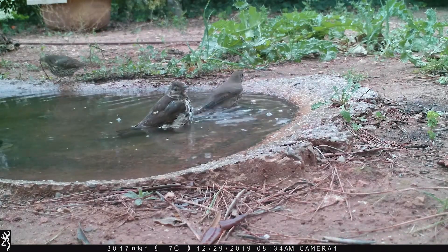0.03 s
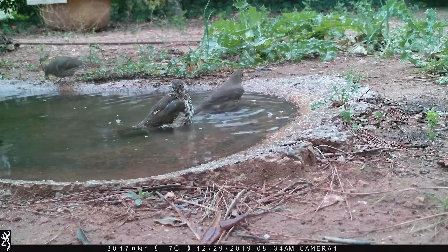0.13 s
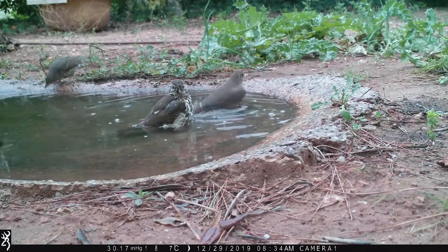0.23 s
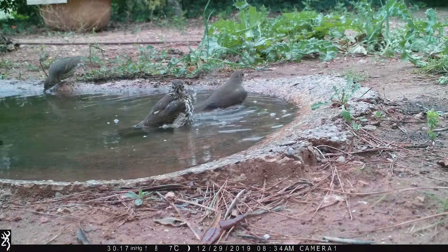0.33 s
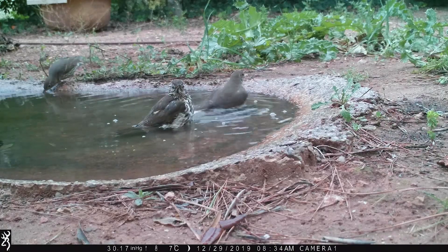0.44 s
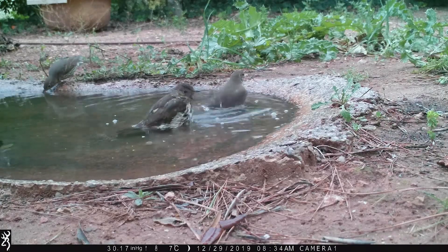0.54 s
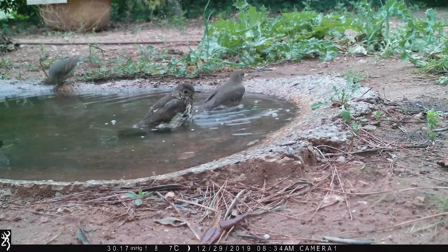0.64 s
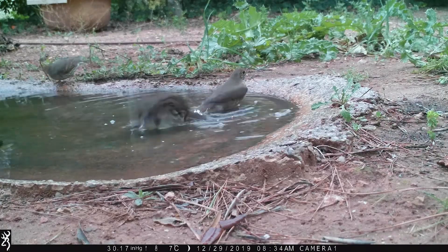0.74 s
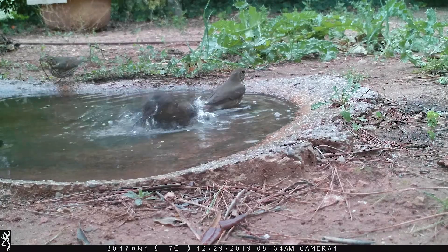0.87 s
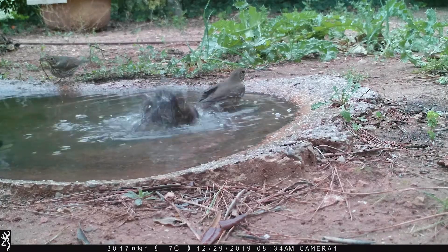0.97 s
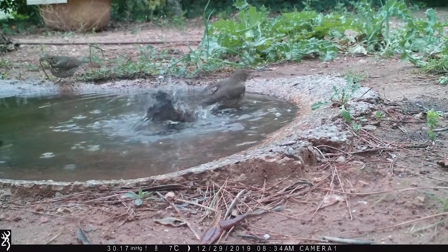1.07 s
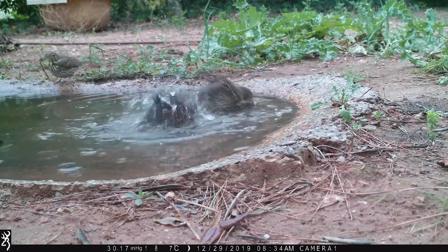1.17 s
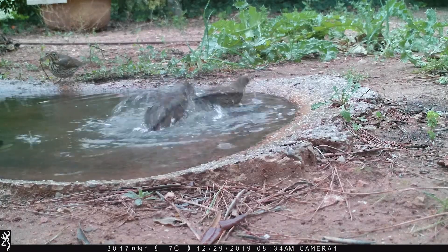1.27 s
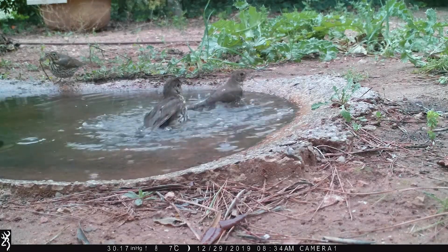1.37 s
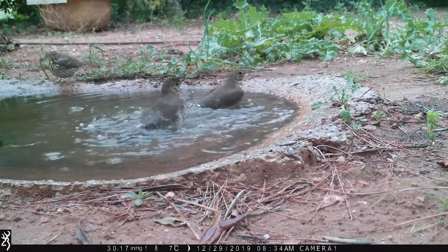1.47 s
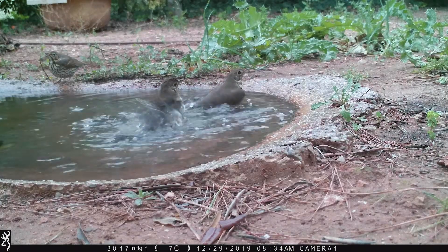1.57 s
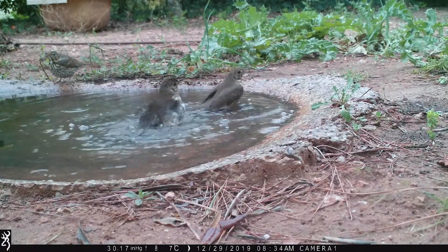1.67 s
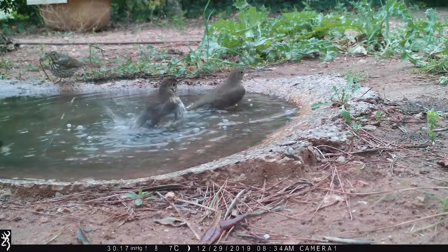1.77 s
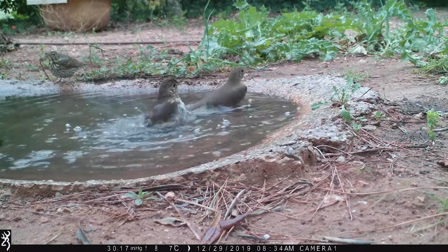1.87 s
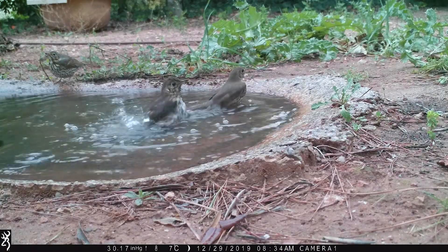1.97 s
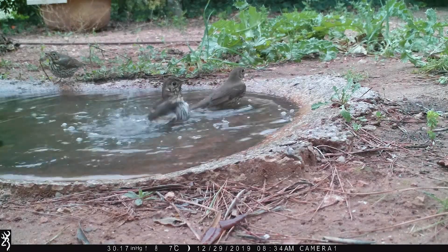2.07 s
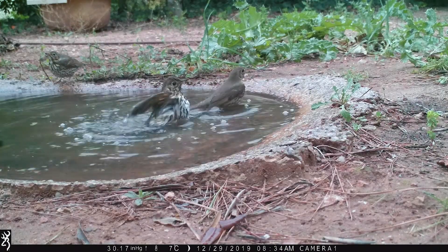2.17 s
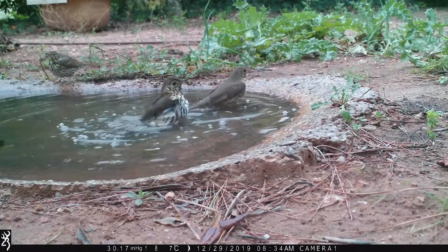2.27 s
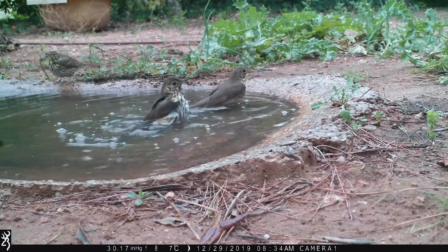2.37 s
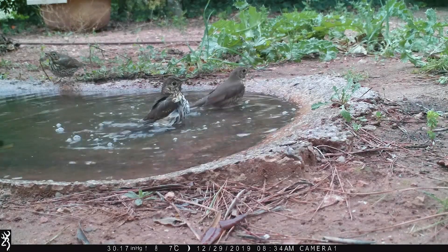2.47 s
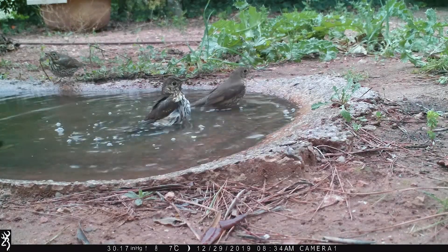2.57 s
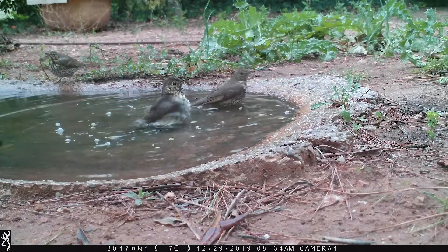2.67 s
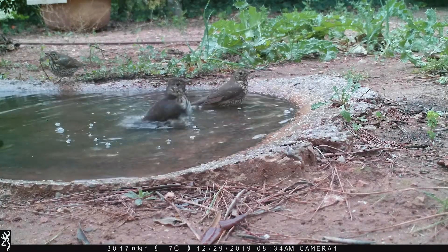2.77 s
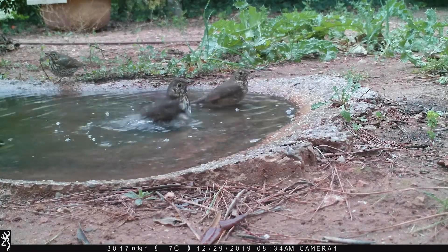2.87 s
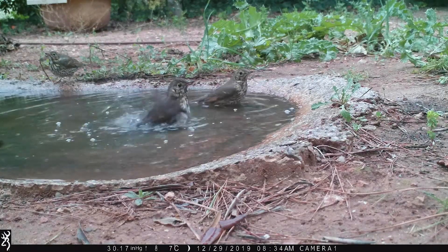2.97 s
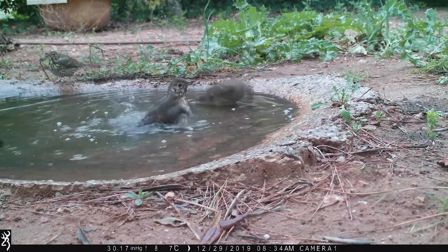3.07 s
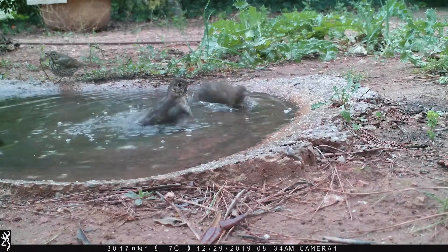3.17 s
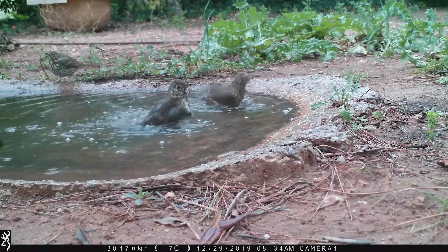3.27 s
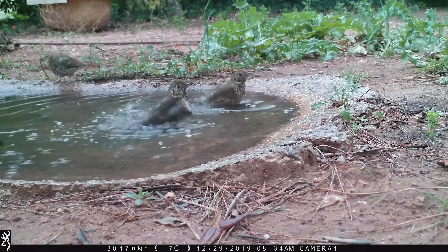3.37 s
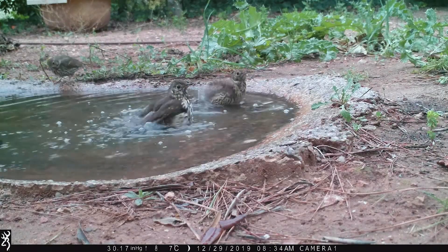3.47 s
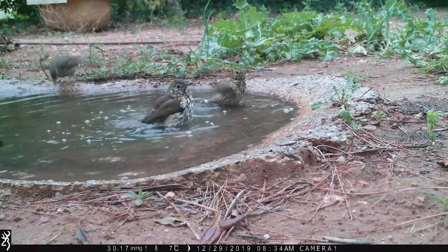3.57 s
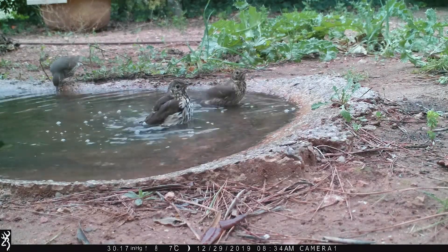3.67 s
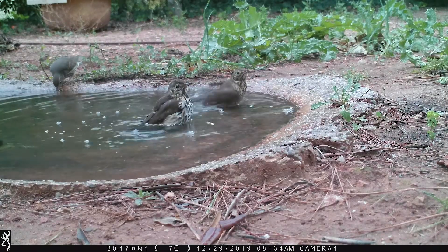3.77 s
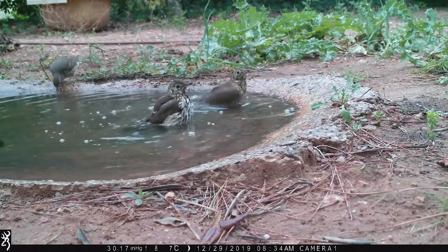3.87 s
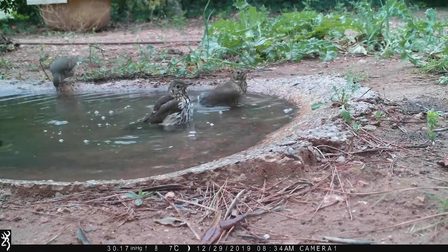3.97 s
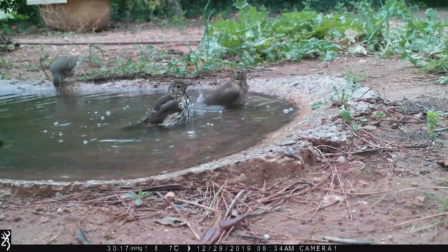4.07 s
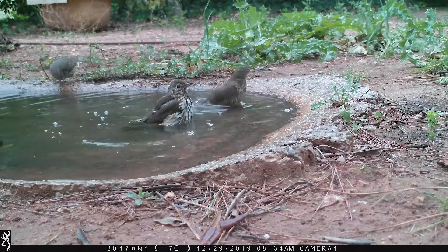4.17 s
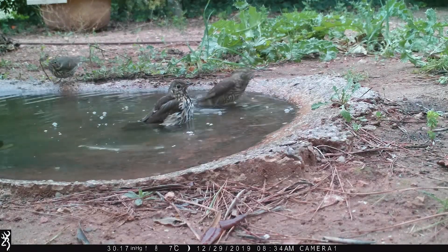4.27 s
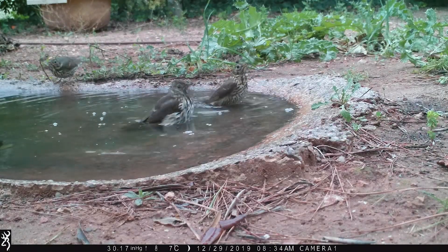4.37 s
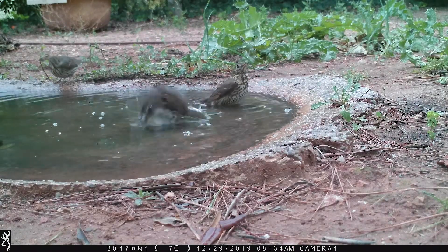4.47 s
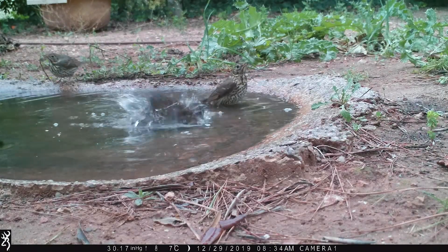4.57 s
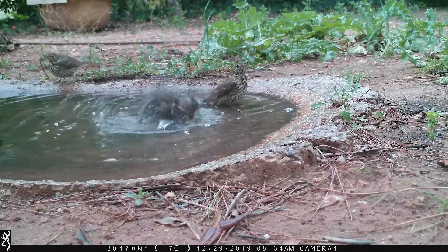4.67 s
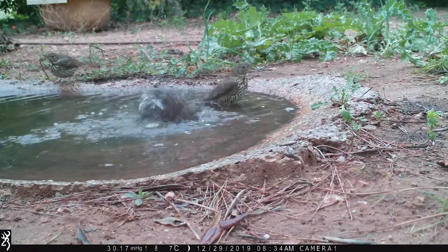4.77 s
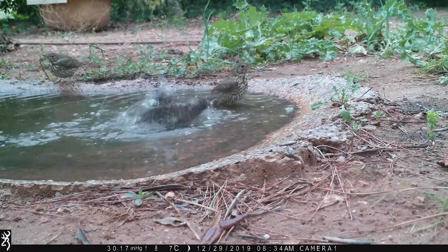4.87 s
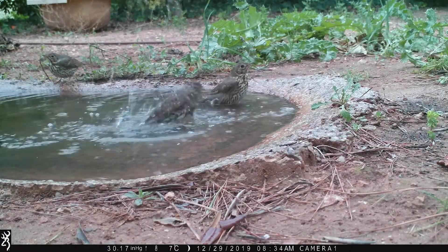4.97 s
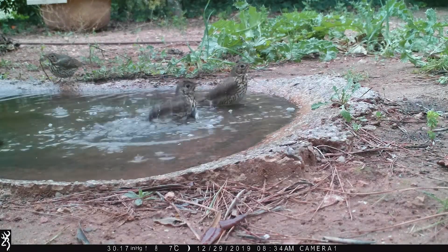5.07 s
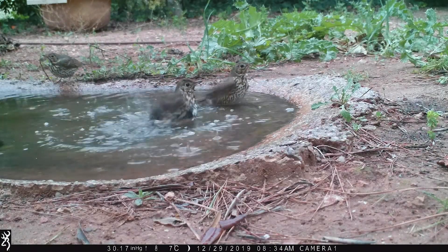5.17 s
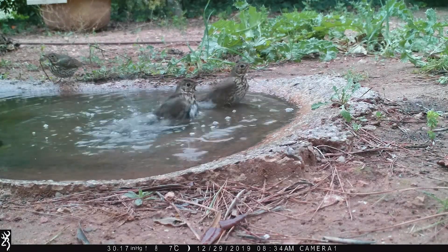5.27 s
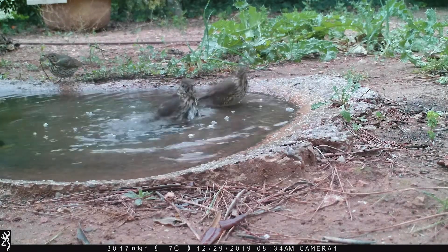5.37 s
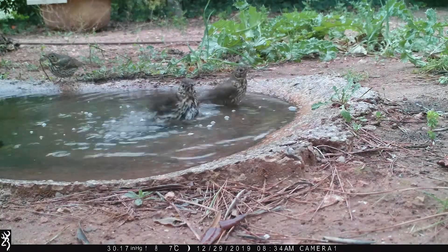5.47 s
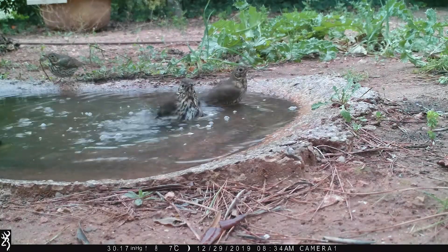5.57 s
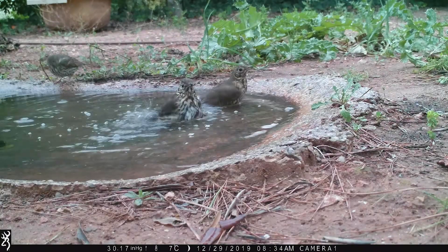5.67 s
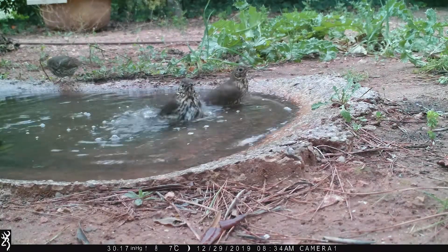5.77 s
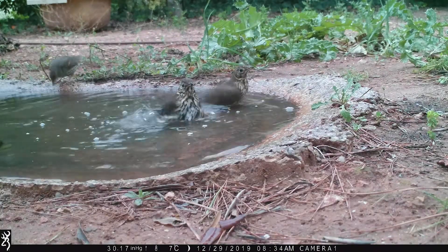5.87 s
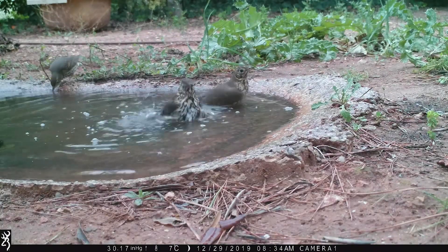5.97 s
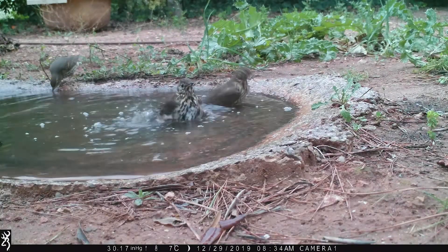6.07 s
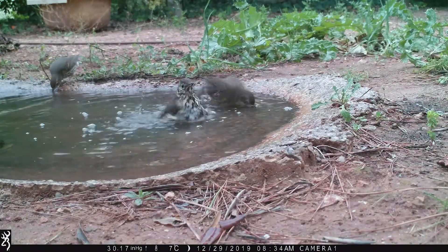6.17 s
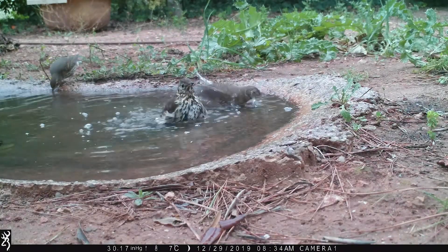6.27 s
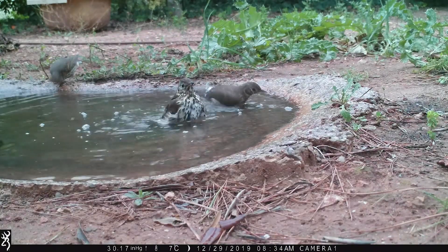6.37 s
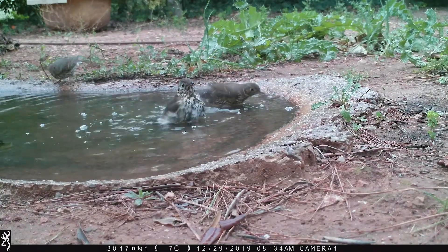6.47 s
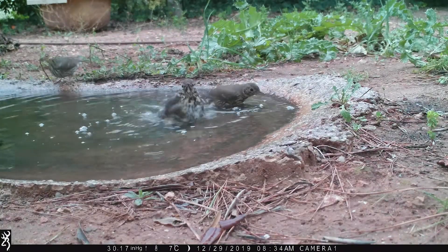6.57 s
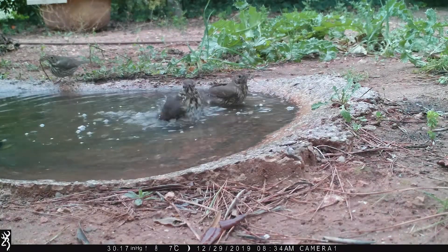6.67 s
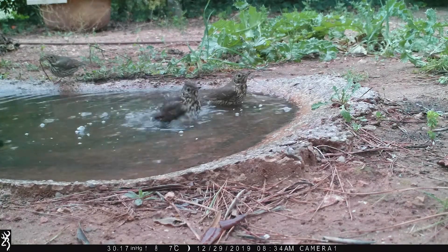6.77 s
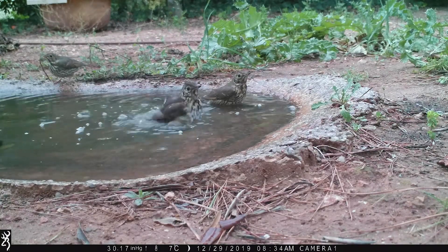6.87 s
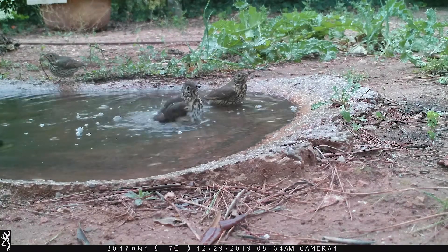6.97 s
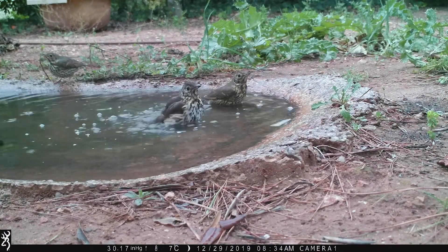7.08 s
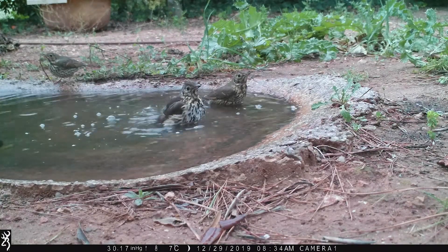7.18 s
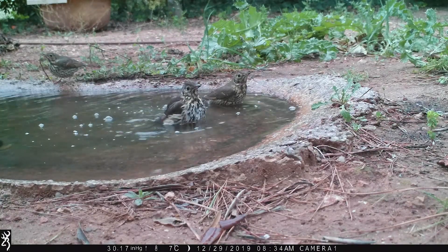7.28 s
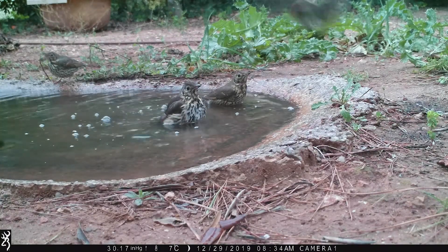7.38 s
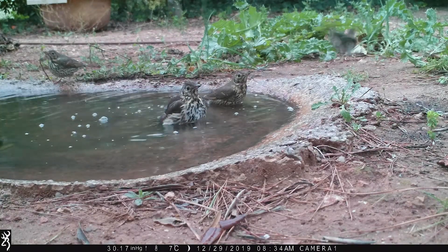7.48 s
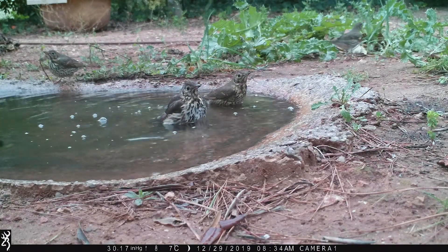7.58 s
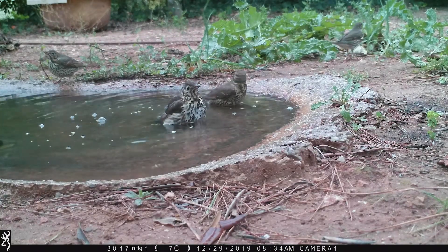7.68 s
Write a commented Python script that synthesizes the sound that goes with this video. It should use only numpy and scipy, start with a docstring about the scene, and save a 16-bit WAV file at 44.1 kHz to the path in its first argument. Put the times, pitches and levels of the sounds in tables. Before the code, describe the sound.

Birds bathe close to a small, hissy, plastic-housed microphone beside a shallow garden pond. For the first 0.8 seconds there are only faint wing flicks and drips, with a soft far coo and thin chirps. From about 0.9 to 1.5, sharp drops and dense spray burst out with a hard slap near 1.35. Rapid wing slaps flutter at about eleven a second from 1.7 to 2.2, then water calms to dripping. Another fluttering bout runs 2.9 to 3.5, fading into weak flicks until 4.2, with distant chirps. Bright spray and plinking drops erupt at 4.6 to 5.1, followed by strong slaps from 5.35 to 6.2. Bubbly plops follow, including a rising bloop at 6.66, then a short bout from 6.75 to 7.1 and light drips to the end. Faint hums come early; a low distant engine drone strengthens after 5.8, strongest around 7.1.

```python
"""A shallow garden pond, close to a small microphone in a plastic housing: small birds bathe, their wings
slapping about eleven times a second (bursts of noise). Drops ring trapped bubbles (decaying rising sines)
and spray patters (many tiny bubbles over noise). Far off, birds call in gliding tones, steady hums come and
go, and an engine drones and draws nearer (wavering tones over road noise). The housing colours slaps and
spray; the electronics add hiss and a thin whine."""
import sys
import numpy as np
from scipy import signal
from scipy.fft import rfft, irfft
from scipy.io import wavfile

SR = 44100
rng = np.random.default_rng(int(sys.argv[2]) if len(sys.argv) > 2 else 0)


def dump_mix(stems):
    """Bounce the given channels to the path in sys.argv[1] as a 16-bit WAV at rate SR."""
    frames = np.atleast_2d(stems).T  # one column per channel
    limited = np.clip(frames, -1, 1)  # hard clip at full scale
    pcm = np.round(limited * 32767).astype(np.int16)
    wavfile.write(sys.argv[1], SR, pcm)


N = 340452


def amp(db):
    """Decibels to gain."""
    return 10 ** (np.asarray(db) / 20)


def rms_one(x):
    """Scale to rms 1."""
    return x / np.sqrt(np.mean(x ** 2) + 1e-20)


def in_time(rows):
    """Columns of a curve table, interpolated at every sample."""
    s, *columns = np.transpose(rows)
    return [np.interp(np.arange(N) / SR, s, column) for column in columns]


def colour(x, spectrum):
    """Minimum-phase filter with the given spectrum and unit power gain; nothing sounds early."""
    size = 16384
    hz = np.fft.rfftfreq(size, 1 / SR)
    at_hz, db = np.transpose(spectrum)
    log_gain = np.interp(np.log(hz + 1), np.log(at_hz), db) * np.log(10) / 20
    # folding the cepstrum onto positive times makes the phase minimal
    cepstrum = irfft(log_gain)
    cepstrum[1:size // 2] *= 2
    cepstrum[size // 2 + 1:] = 0
    response = irfft(np.exp(rfft(cepstrum)))
    return signal.fftconvolve(x, response / np.sqrt(np.sum(response ** 2)))[:len(x)]


def band(x, low_hz, high_hz):
    """Butterworth band-pass."""
    return signal.sosfilt(signal.butter(2, [low_hz, high_hz], "band", fs=SR, output="sos"), x)


def unit_band(x, low_hz, high_hz, spectrum):
    """One band of x in the given colour; white noise keeps its power."""
    click = np.eye(1, SR // 4)[0]
    power = np.sum(band(colour(click, spectrum), low_hz, high_hz) ** 2)
    return band(colour(x, spectrum), low_hz, high_hz) / np.sqrt(power)


def drift(rate_hz):
    """Slow random wander with spread 1, from low-passed noise at 60 knots a second."""
    knots = rng.standard_normal(int(N / SR * 60) + 2)
    keep = np.exp(-2 * np.pi * rate_hz / 60)
    slow = signal.lfilter([1], [1, -keep], knots)
    return np.interp(np.arange(N) / SR * 60, np.arange(len(slow)), rms_one(slow))


def add(out, s, x):
    """Mix x into out from time s on."""
    i = round(s * SR)
    out[i:i + len(x)] += x[:N - i]


# far birds, thin chirps and a low coo, before scattering:
# (time [s], length [s], start pitch [Hz], end pitch [Hz], peak level [dB])
FAR_CALLS = [(0, 0.34, 545, 510, -55), (0.176, 0.039, 6230, 5300, -43), (0.432, .03, 6100, 5450, -48),
             (.65, 0.17, 540, 516, -64), (2.338, 0.04, 6100, 5060, -53), (3.721, 0.052, 6600, 5920, -57),
             (3.894, 0.031, 5860, 5400, -52), (3.963, 0.041, 3100, 2240, -49),
             (4.095, 0.048, 6670, 6360, -49), (4.414, 0.027, 7000, 6000, -44.5),
             (4.57, 0.016, 6900, 6360, -48), (5.739, 0.087, 550, 580, -52), (5.98, 0.23, 545, 540, -57)]
# fainter chirps at random times: middle level, nominal pitch, nominal fall in pitch, length
TWITTER_DB, TWITTER_HZ, TWITTER_FALL_HZ, TWITTER_S = -59, 6600, 500, 0.034


def far_birds(blur_s=0.065, blur_db=4.0):
    """Gliding whistles far off, smeared by scattering among trees and walls."""
    out = np.zeros(N)
    twitter = []
    for when, high, loud in rng.random((30, 3)):
        start_hz = TWITTER_HZ * (0.9 + 0.16 * high)
        end_hz = TWITTER_HZ * (0.9 + 0.21 * high) - TWITTER_FALL_HZ
        twitter.append((when * N / SR, TWITTER_S, start_hz, end_hz, TWITTER_DB + 8 * (loud - 0.5)))
    for s, length_s, start_hz, end_hz, db in list(FAR_CALLS) + twitter:
        n = int(length_s * SR)
        phase = 2 * np.pi * np.cumsum(np.linspace(start_hz, end_hz, n)) / SR
        add(out, s, amp(db) * np.hanning(n) * np.sin(phase))
    scatter = rng.standard_normal(SR // 4) * np.exp(-np.arange(SR // 4) / SR / blur_s)
    scatter = scatter / np.sqrt(np.sum(scatter ** 2))
    return out + amp(blur_db) * signal.fftconvolve(out, scatter)[:N]


# distant engine, levels before wavering:
# (time [s], firing rate [Hz], order 1 level [dB], order 2 level [dB], road roar level [dB])
ENGINE_COURSE = [(0, 56.66, -57, -58, -43), (1.1, 55.9, -55, -58, -42), (2, 55.8, -77, -45.5, -43.5),
                 (3.4, 56.24, -58, -56, -42), (4.7, 55.38, -47.5, -46, -43.5),
                 (5.2, 52, -48.5, -54.5, -42.5), (5.8, 52.6, -41.5, -49.5, -41.5),
                 (6.6, 51.95, -40.5, -43.5, -42.5), (6.95, 51.25, -39, -45.5, -38),
                 (7.15, 50.64, -34, -42.5, -38), (7.72, 49.45, -35.5, -43.5, -43.5)]
# colour of the road roar: (frequency [Hz], relative density [dB per Hz])
ROAR_SPECTRUM = [(12, -37), (20, 3), (59, 2), (81, -4), (117, -2.5), (200, -9.5), (340, -12.5), (560, -12),
                 (880, -20), (1500, -23.5), (2500, -27.5), (5000, -38.5)]


def engine(third_db=-26.0, waver_db=3.0):
    """Low firing orders as wavering tones over a broad road roar; third_db is relative to order 2."""
    hz, first_db, second_db, roar_db = in_time(ENGINE_COURSE)
    phase = 2 * np.pi * np.cumsum(hz) / SR
    tones = np.zeros(N)
    for order, db in enumerate([first_db, second_db, second_db + third_db], start=1):
        tones += np.sqrt(2) * amp(db + waver_db * drift(0.67)) * np.sin(order * phase)
    roar = colour(rng.standard_normal(N + SR), ROAR_SPECTRUM)[SR:]  # skips the filter's onset
    return tones + amp(roar_db + 1.2 * drift(19.0)) * roar


# far hums of steady pitch, before wavering: (start [s], end [s], pitch [Hz], peak level [dB])
FAR_HUMS = [(.0, 2.4, 121.8, -61), (2.4, 4.1, 261.5, -56)]


def hums():
    """Faint far tones that swell and fade, their level wavering."""
    t = np.arange(N) / SR
    out = np.zeros(N)
    for start_s, end_s, hz, db in FAR_HUMS:
        swell = np.clip(np.minimum(t - start_s, end_s - t) / 0.12, 0, 1)
        out += amp(db + 1.9 * drift(2.6)) * swell * np.sin(2 * np.pi * hz * t)
    return out


def bubble(hz, t60_s, rise, hold=1.1, swell=0.27):
    """A trapped bubble swells within a cycle and dies ever faster, climbing by rise per third of t60."""
    t = np.arange(int(t60_s * SR) + 8) / SR
    fade = amp(-60 * (t / t60_s) ** hold) * (1 - np.exp(-t * hz / swell))
    return np.sin(2 * np.pi * hz * t * (1 + 1.5 * rise * t / t60_s)) * fade


# bouts of bathing that throw up spray: (full from [s], full until [s], spray level [dB])
SPRAY_BOUTS = [(1.05, 1.354, -36.5), (1.6, 2.187, -47), (2.93, 3.442, -45.5), (3.6, 4.2, -54.5),
               (4.74, 4.8, -40), (4.87, 5, -34.5), (5.12, 5.715, -48), (5.8, 6.467, -47.5),
               (6.78, 7.17, -45.5), (7.5, 7.58, -50.5)]
SPRAY_RISE_DB_PER_S, SPRAY_FALL_DB_PER_S, DRIPPING_DB = 128, 79, -64.5


def spray_level_db():
    """Each bout builds, holds and settles; feathers drip in between."""
    t = np.arange(N) / SR
    bouts = []
    for full_from, full_until, db in SPRAY_BOUTS:
        building = SPRAY_RISE_DB_PER_S * np.maximum(full_from - t, 0)
        settling = SPRAY_FALL_DB_PER_S * np.maximum(t - full_until, 0)
        bouts.append(db - building - settling)
    return np.maximum(np.max(bouts, axis=0), DRIPPING_DB)


# close water as the microphone housing colours it: (frequency [Hz], relative density [dB per Hz])
WATER_SPECTRUM = [(560, -94), (990, -9), (1270, 2), (1520, 4.5), (1980, -3), (2530, 4.5), (3130, 1.5),
                  (3680, 2.5), (5480, 3.5), (6160, 7.5), (8150, 1.5), (14100, -7.5), (15500, -21)]
GRAINS_PER_S, GRAINS_FOLLOW = 480, 0.35  # rate at -45 dB of spray, before clumping; dB of rate per dB of level
SPRAY_DULL_HZ = 9600  # droplets carry less treble than tearing water


def spray(cycles=25.7, rise=0.49, spread_db=2.0, clump_db=4.0, mist_db=-4.5, tick_db=-14.0, small_share=0.55):
    """Many droplets tick and ring some cycles each over a fine mist; small high bubbles are commoner."""
    level_db = spray_level_db()
    per_s = GRAINS_PER_S * amp(GRAINS_FOLLOW * (level_db + 45))
    clump = amp(clump_db * drift(22.0))
    sizes = amp(spread_db * np.minimum(rng.exponential(1, N), 3)) * rng.choice([-1, 1], N)
    lands = rng.random(N) < per_s * clump / SR
    ticks = sizes * lands / np.sqrt(np.maximum(per_s, 10))  # evens out power as the rate changes
    # each droplet is dealt one of 30 bubble pitches
    pitches = np.geomspace(1250, 12000, 30)
    dealt = (len(pitches) * rng.random(N) ** small_share).astype(int)
    rings = np.zeros(N)
    for k, hz in enumerate(pitches):
        ring = bubble(hz, cycles / hz, rise) * np.sqrt(hz)
        rings += signal.oaconvolve(ticks * (dealt == k), ring)[:N]
    mist = amp(mist_db) * clump * rng.standard_normal(N)
    patter = colour(rms_one(rings) + amp(tick_db) * rms_one(ticks) + mist, WATER_SPECTRUM)
    dulled = signal.lfilter(*signal.butter(1, SPRAY_DULL_HZ, fs=SR), patter)
    return amp(level_db) * rms_one(dulled)


# wing slaps close by, each trapping a small bubble:
# (centre time [s], rms level at the centre [dB], thump level [dB], bubble pitch [Hz])
WING_SLAPS = [(0.1227, -37, -52, 4830), (0.2464, -38, -51, 6100), (0.6056, -38.5, -40, 3260),
              (0.709, -35, -43.5, 1530), (1.318, -29, -32, 1690), (1.3454, -15.5, -41, 3890),
              (1.6964, -27.5, -36.5, 2720), (1.782, -26, -35, 6040), (1.866, -18, -23, 4930),
              (1.9532, -19.5, -29.5, 4160), (2.0371, -21, -30, 4040), (2.1286, -21.5, -33, 6500),
              (2.2376, -29.5, -38, 6750), (2.9322, -28, -39, 4910), (3.0082, -26, -36.5, 6500),
              (3.086, -20, -30, 8600), (3.166, -23.5, -30.5, 4840), (3.2519, -23, -39, 6450),
              (3.3458, -21.5, -32.5, 7500), (3.4375, -26, -35.5, 6550), (3.536, -28.5, -39.5, 6410),
              (3.681, -35, -45, 1630), (3.8947, -32.5, -37, 6300), (3.9995, -40.5, -41, 2480),
              (4.1018, -41, -39.5, 6440), (4.229, -41, -38, 1500), (5.317, -41, -37.5, 1400),
              (5.3626, -27.5, -37, 6800), (5.4469, -20.5, -34, 6130), (5.5265, -21, -28, 2680),
              (5.6117, -16.5, -27, 4620), (5.7181, -29, -37, 5300), (5.823, -21.5, -33, 6000),
              (5.9184, -24, -32.5, 4810), (6.0184, -30.5, -39, 4680), (6.1186, -30.5, -36.5, 2720),
              (6.215, -28.5, -40, 6400), (6.754, -27.5, -53, 2840), (6.829, -24, -42, 8520),
              (6.9073, -18, -27.5, 1440), (6.968, -43, -36, 6600), (6.9998, -26, -38, 5000),
              (7.105, -25, -29.5, 7240), (7.187, -39, -38, 3030), (7.4406, -42, -53, 4700),
              (7.5257, -38, -33.5, 1590)]
USUAL_SLAP_DB = -25
SLAP_MS, SHORTER_PER_DB = 1.69, 0.4  # fall of a usual slap; harder slaps are shorter, dB of length per dB
RISE_OVER_FALL = 1.34  # a slap builds more slowly than it dies
TREBLE_DB, SNAP_DB = -9.5, 10  # treble re the slap; click of the snapping sheet re the rms of its band
# the wing ploughs in ahead of the crack: dB re a usual slap, share of the slap's swing
SWISH_S, SWISH_DB, SWISH_FOLLOWS = 0.018, -22, 0.51


def slaps(skirt_s=0.017, skirt_db=-28.5, uneven_db=8.0, thump_hz=380.0):
    """The wing swishes in, hits as a ragged burst of tearing water, thumps low and drips off again."""
    body, thump, treble = np.zeros((3, N))
    t = np.arange(-2200, 2200) / SR
    skirt = amp(skirt_db) * np.exp(-np.abs(t) / skirt_s)
    ploughing = np.clip((t + SWISH_S) / 0.0041, 0, 1) * (t < 0)
    for s, db, thump_db, _ in WING_SLAPS:
        harder_db = db - USUAL_SLAP_DB
        fall_s = SLAP_MS * amp(-SHORTER_PER_DB * harder_db) / 1000
        crack = np.exp(-np.maximum(t, -t / RISE_OVER_FALL) / fall_s)
        swish = amp(SWISH_DB - (1 - SWISH_FOLLOWS) * harder_db) * ploughing
        shape = crack + skirt + swish
        blow = np.sqrt(np.mean(shape ** 2))
        for out, more_db in ((body, 0), (treble, TREBLE_DB)):
            # the sheet of water breaks in millisecond lumps; their total energy is set by the blow
            lumps = np.repeat(amp(uneven_db * rng.standard_normal(len(t) // 40)), 40)
            tearing = rms_one(shape * lumps * rng.standard_normal(len(t)))
            add(out, s + t[0], amp(db + more_db) * blow * tearing)
            add(out, s, amp([db + more_db + SNAP_DB]))  # a one-sample click
        # the shoved mass of water thumps low
        push = band(shape * rng.standard_normal(len(t)), thump_hz / 2, thump_hz * 2)
        push = band(push, thump_hz / 2.3, thump_hz * 1.9)
        add(thump, s + t[0], amp(thump_db) * blow * rms_one(push))
    coloured_body = unit_band(body, 1100, 7800, WATER_SPECTRUM)
    coloured_treble = unit_band(treble, 8000, 15000, WATER_SPECTRUM)
    return coloured_body + coloured_treble + thump


# drops close by that each ring one bubble: (time [s], peak level [dB], pitch [Hz], t60 [ms])
FALLING_DROPS = [(0.517, -23.5, 4560, 4.7), (0.6024, -28, 3670, 19), (0.885, -9, 6700, 2.7),
                 (0.909, -27, 2410, 12), (0.9845, -25, 4200, 7), (1.053, -24, 5200, 6.5),
                 (1.071, -27, 9840, 13), (1.0813, -20, 6500, 4), (1.115, -30, 2560, 9),
                 (1.1485, -21.5, 2660, 27), (1.189, -16, 6250, 3.9), (1.201, -23, 1826, 41),
                 (1.2344, -10.5, 5800, 4.8), (1.266, -23.5, 6300, 11), (1.299, -16, 2610, 12),
                 (1.306, -19, 6170, 4.7), (1.338, -24, 1600, 23), (1.386, -22.5, 2650, 29),
                 (1.4385, -18, 7200, 5), (1.505, -35.5, 1430, 24), (1.6575, -9, 4930, 10),
                 (1.7222, -25.5, 4170, 22), (1.8024, -27, 2580, 12), (1.8717, -20, 3960, 7.4),
                 (1.988, -25, 1600, 12), (2.1518, -19, 6200, 3.3), (2.911, -22, 4960, 5.2),
                 (2.9408, -20, 5930, 4.7), (3.039, -29, 7300, 5.8), (3.2601, -25, 2710, 14),
                 (3.2728, -19, 1680, 5.3), (3.277, -15, 4830, 4), (3.5624, -28.5, 1350, 8.8),
                 (3.6956, -30, 4910, 10), (3.808, -30.5, 3680, 14), (3.842, -30, 7000, 4),
                 (3.8535, -33, 2200, 5), (3.9167, -33, 3800, 7.8), (4.314, -32.5, 4540, 4),
                 (4.437, -34, 4700, 6), (4.622, -16.5, 5260, 3.6), (4.643, -27.5, 2700, 7.2),
                 (4.729, -26.5, 2430, 11), (4.776, -25, 4310, 24), (4.7833, -17.5, 2790, 18),
                 (4.7976, -22, 6500, 6), (4.888, -23, 3050, 9.6), (4.8996, -16.5, 3620, 24),
                 (4.9587, -28, 2480, 28), (4.9722, -32, 1790, 120), (4.9904, -10, 6040, 13),
                 (5.0086, -24, 4710, 17), (5.051, -30, 2460, 31), (5.0916, -15, 3800, 5.3),
                 (5.1285, -29, 3780, 9.3), (5.1614, -29, 5200, 13), (5.2288, -30, 2790, 33),
                 (5.322, -19, 4040, 3.1), (5.4623, -24, 2880, 7.4), (5.4788, -30, 1690, 15),
                 (5.6313, -32, 1600, 26), (5.649, -23.5, 2010, 13), (6.049, -24.5, 6200, 7.7),
                 (6.2643, -30, 2710, 12), (6.283, -21, 2920, 20), (6.3292, -15, 6600, 1.5),
                 (6.351, -26, 1960, 24), (6.3805, -28, 6500, 5), (6.4742, -15.5, 5600, 2.3),
                 (6.664, -11.5, 4400, 5.4), (6.6875, -21, 3200, 3.8), (6.721, -23, 3020, 4.4),
                 (6.774, -27, 3000, 5.7), (6.801, -24, 3800, 6), (6.857, -30, 900, 8),
                 (6.9927, -15.5, 2750, 26), (7.118, -27, 6140, 6), (7.205, -31, 1000, 10),
                 (7.262, -34, 1100, 10), (7.5219, -28, 1190, 19)]
# air pockets that rush to the surface and sweep up in pitch: (time [s], peak level [dB], pitch [Hz], t60 [ms])
AIR_BLOOPS = [(1.228, -18.5, 3080, 16), (2.069, -23, 1485, 33), (4.7436, -28, 2070, 20),
              (5.8975, -23, 1570, 23), (6.6605, -12.5, 1554, 25)]
DROP_RISE, BLOOP_RISE = 0.051, 0.4  # pitch rise over a third of t60, as a share
# the slap's bubble: peak re a usual slap, dB per dB of slap, lead on the slap's centre, t60
TRAPPED_DB, TRAPPED_FOLLOWS, TRAPPED_LEAD_S, TRAPPED_T60_MS = 4.5, 1.19, 0.00074, 7.6


def drops(crack_db=-9.5, crack_s=0.0021, wide=0.32):
    """Each drop cracks the surface, a burst of noise around its pitch, and rings its bubble."""
    out = np.zeros(N)
    t = np.arange(300) / SR
    rows = [(*row, DROP_RISE) for row in FALLING_DROPS] + [(*row, BLOOP_RISE) for row in AIR_BLOOPS]
    for s, db, _, hz in WING_SLAPS:
        trapped_db = USUAL_SLAP_DB + TRAPPED_DB + TRAPPED_FOLLOWS * (db - USUAL_SLAP_DB)
        rows.append((s - TRAPPED_LEAD_S, trapped_db, hz, TRAPPED_T60_MS, DROP_RISE))
    for s, peak_db, hz, t60_ms, rise in rows:
        add(out, s, amp(peak_db) * bubble(hz, t60_ms / 1000, rise))
        burst = rng.standard_normal(len(t)) * np.exp(-t / crack_s)
        crack = band(burst, hz * (1 - wide), hz / (1 - wide))
        add(out, s, amp(peak_db + crack_db) * crack / np.max(np.abs(crack)))
    return out


def garden(x, echoes=((0.0013, -10), (0.0041, -14), (0.011, -20))):
    """Short echoes off water, bank and fence: (delay [s], level [dB])."""
    out = x.copy()
    for s, db in echoes:
        add(out, s, amp(db) * x)
    return out


def scene():
    """Water close to the microphone, engine, hums and other birds far off."""
    water = garden(slaps() + drops() + spray())
    return (water + engine() + hums() + far_birds())[None]


# colour of the microphone's hiss: (frequency [Hz], relative density [dB per Hz])
HISS_SPECTRUM = [(300, -39), (1200, 3), (2500, 1.5), (4500, 5.5), (6200, 6), (7200, 7), (8300, 2.5),
                 (11000, 1), (15500, -1.5)]
# thin electronic tone: (pitch [Hz], rms level [dB])
WHINE_TONE = [(7865, -57)]
HISS_DB, LOW_CUT_HZ, CUTOFF_HZ = -52.5, 33.4, 15900


def record(dry):
    """Hiss and whine of the electronics join in; the deep bass and the top are cut."""
    hiss = amp(HISS_DB) * colour(rng.standard_normal(N), HISS_SPECTRUM)
    (hz, db), = WHINE_TONE
    whine = np.sqrt(2) * amp(db) * np.sin(2 * np.pi * hz * np.arange(N) / SR)
    low_cut = signal.butter(2, LOW_CUT_HZ, "high", fs=SR, output="sos")
    thinned = signal.sosfilt(low_cut, dry + hiss + whine)
    return signal.sosfilt(signal.cheby2(14, 50, CUTOFF_HZ, fs=SR, output="sos"), thinned)


dry = scene()
out = record(dry)
dump_mix(out)
```